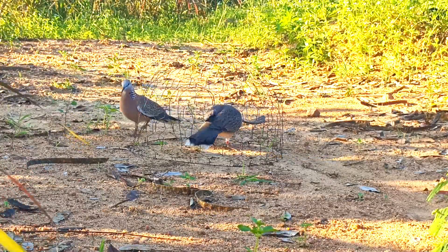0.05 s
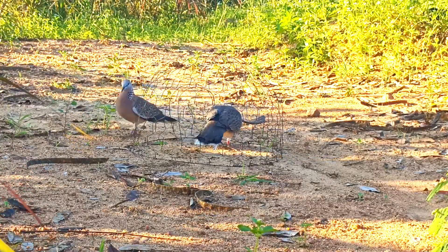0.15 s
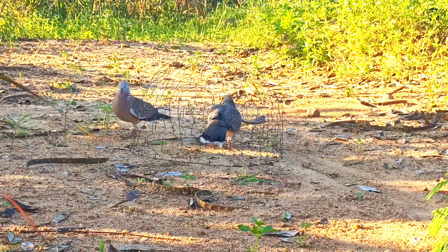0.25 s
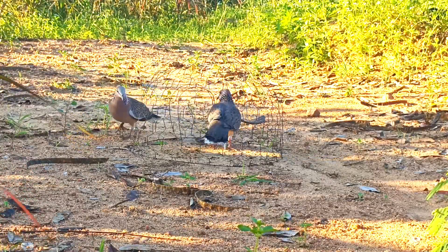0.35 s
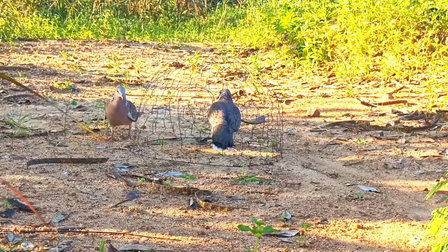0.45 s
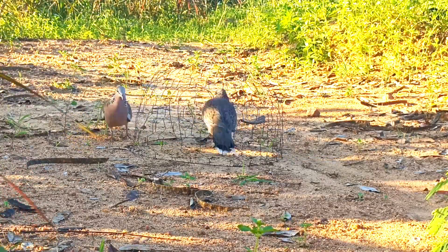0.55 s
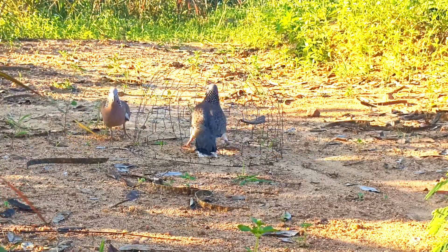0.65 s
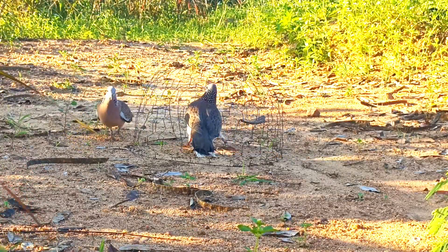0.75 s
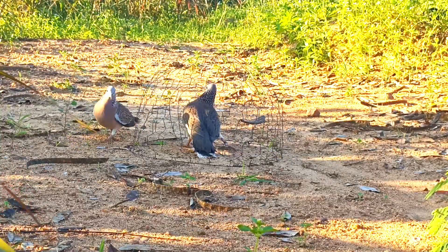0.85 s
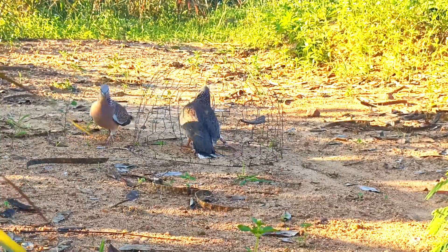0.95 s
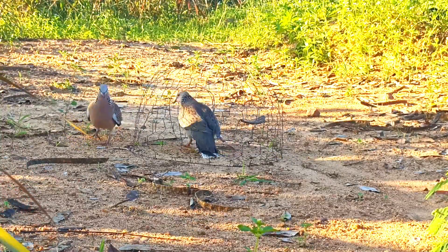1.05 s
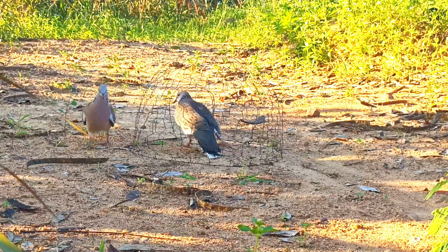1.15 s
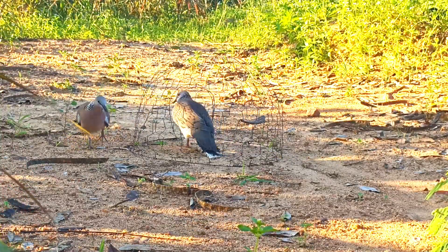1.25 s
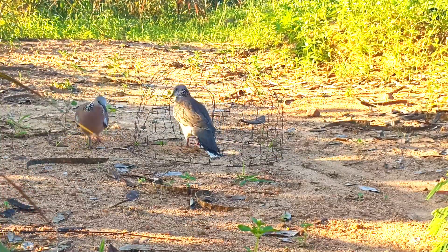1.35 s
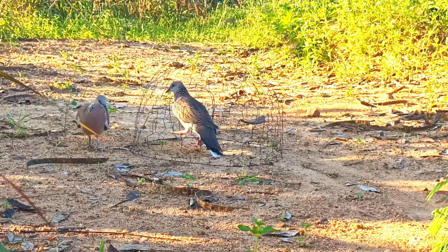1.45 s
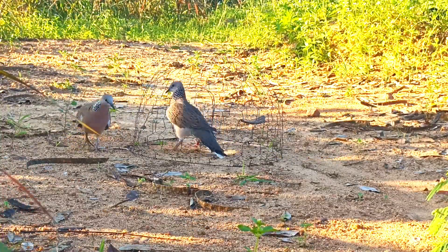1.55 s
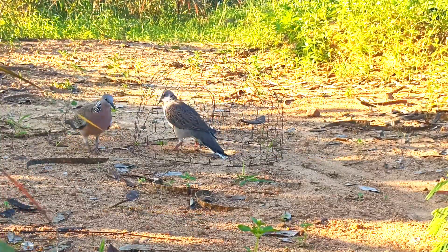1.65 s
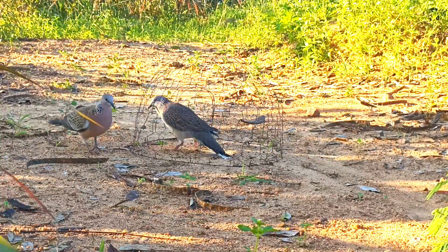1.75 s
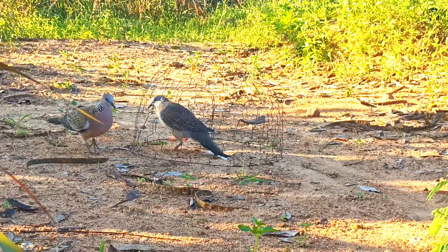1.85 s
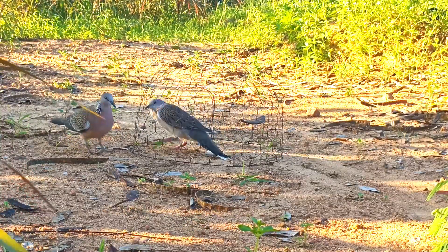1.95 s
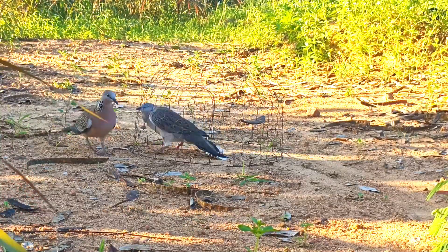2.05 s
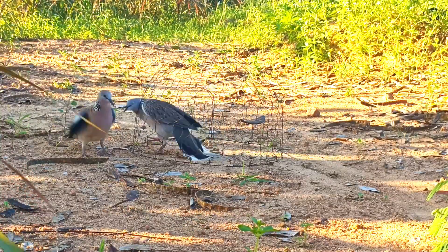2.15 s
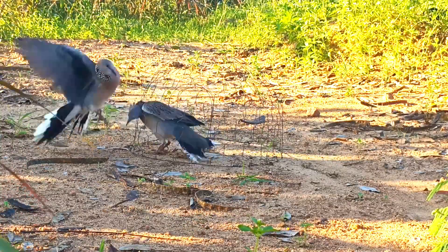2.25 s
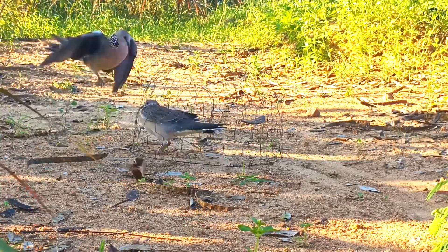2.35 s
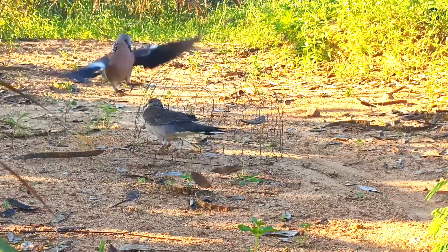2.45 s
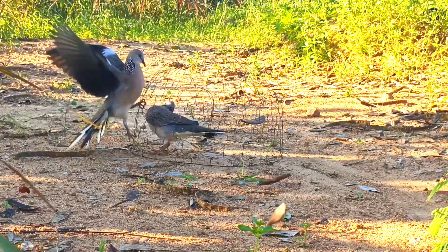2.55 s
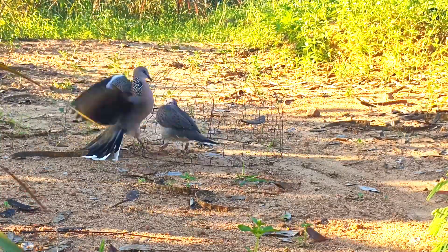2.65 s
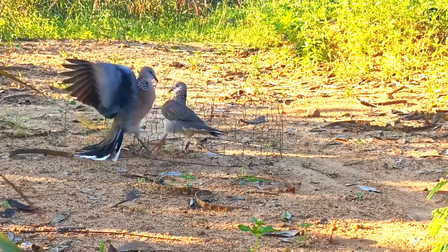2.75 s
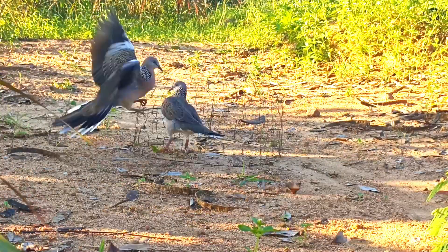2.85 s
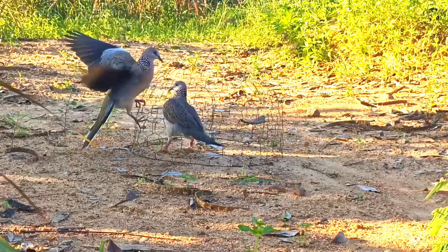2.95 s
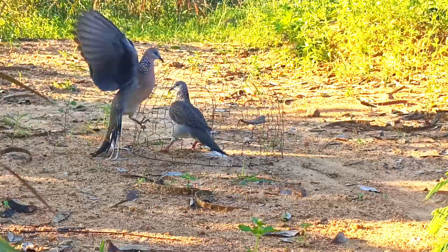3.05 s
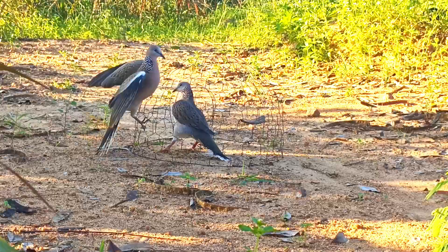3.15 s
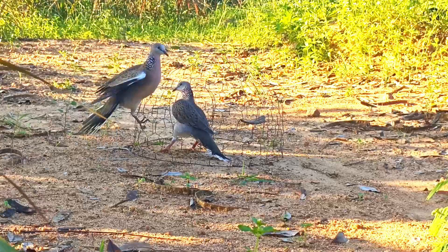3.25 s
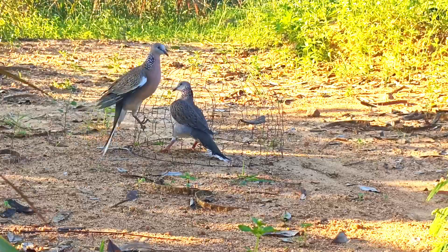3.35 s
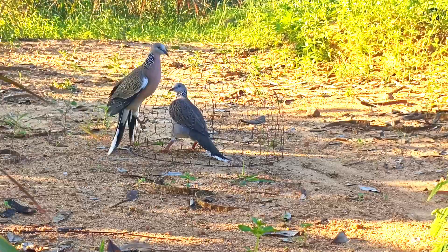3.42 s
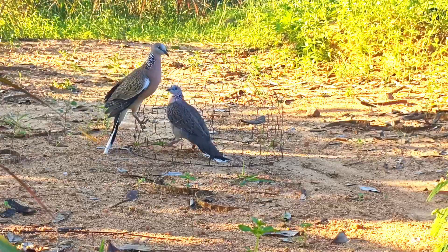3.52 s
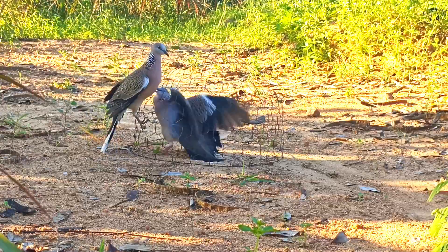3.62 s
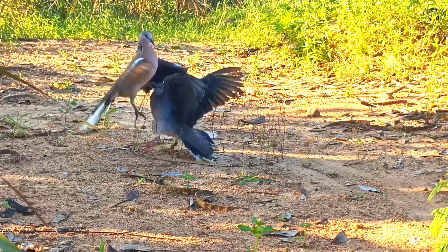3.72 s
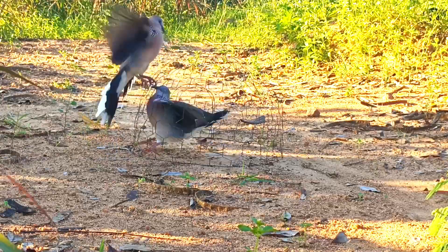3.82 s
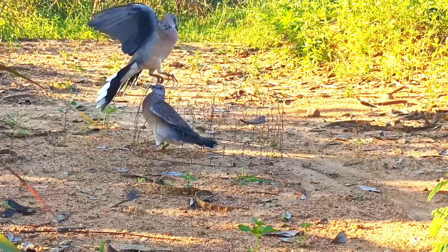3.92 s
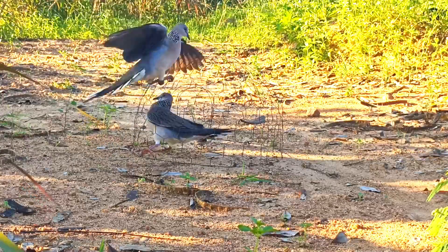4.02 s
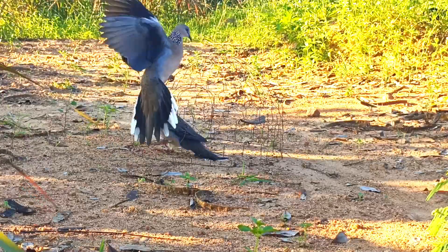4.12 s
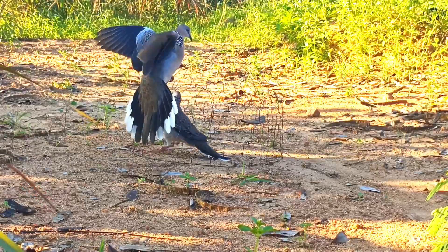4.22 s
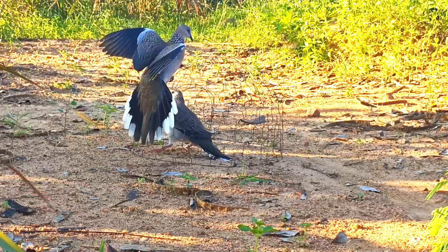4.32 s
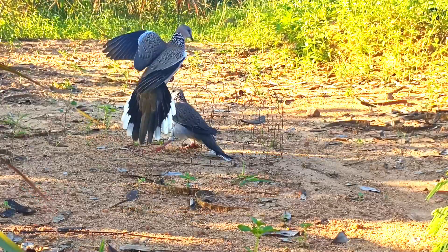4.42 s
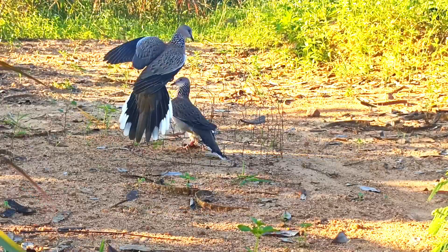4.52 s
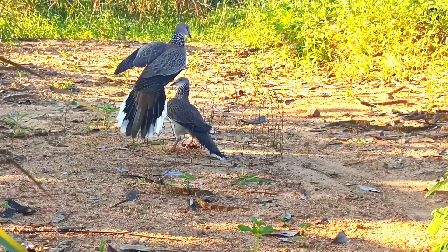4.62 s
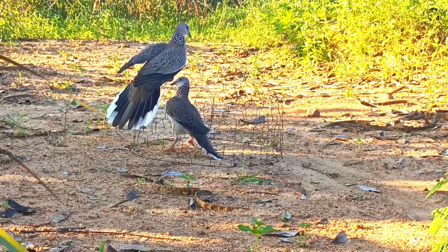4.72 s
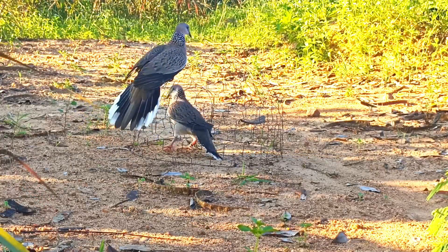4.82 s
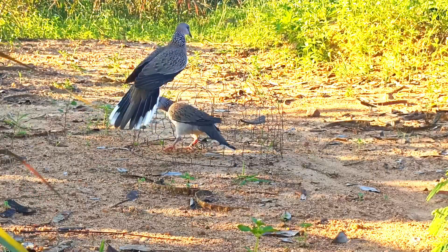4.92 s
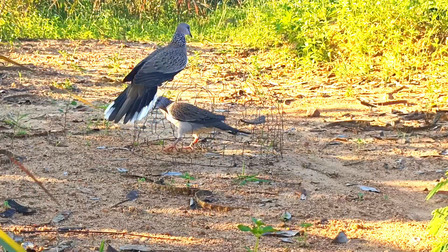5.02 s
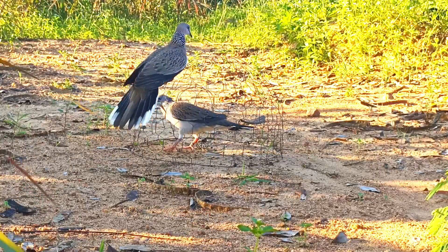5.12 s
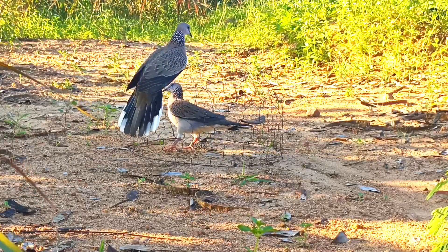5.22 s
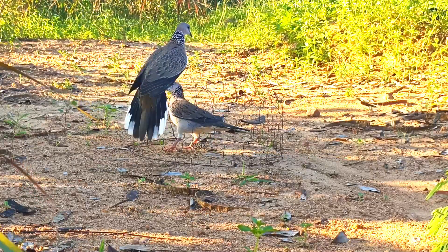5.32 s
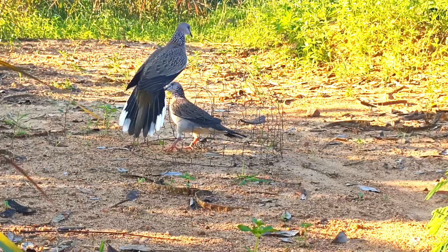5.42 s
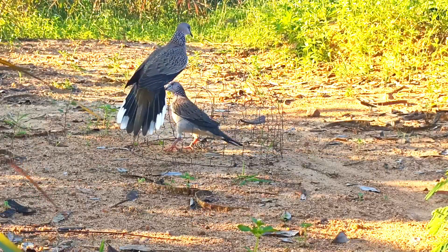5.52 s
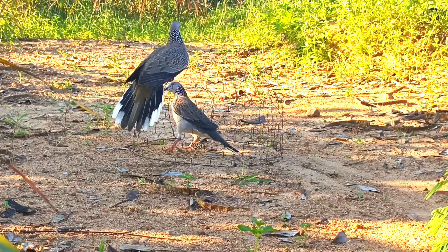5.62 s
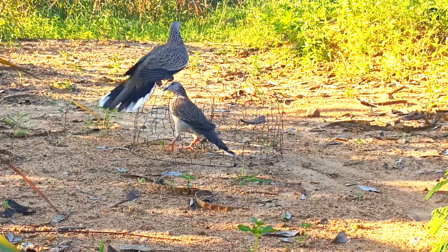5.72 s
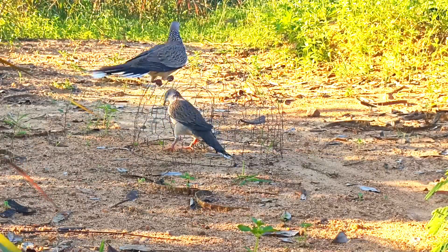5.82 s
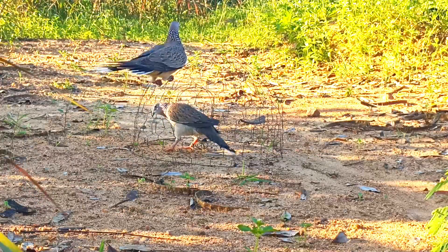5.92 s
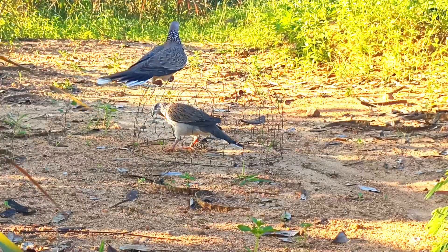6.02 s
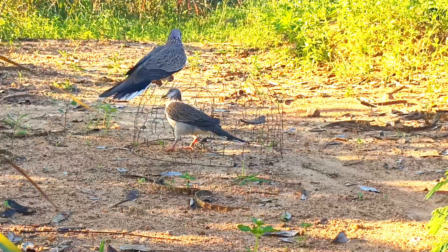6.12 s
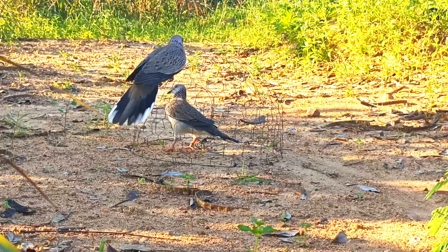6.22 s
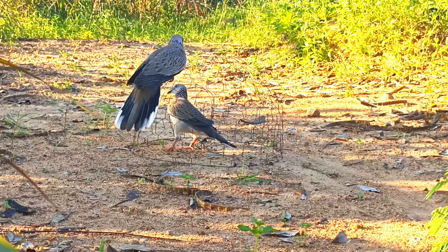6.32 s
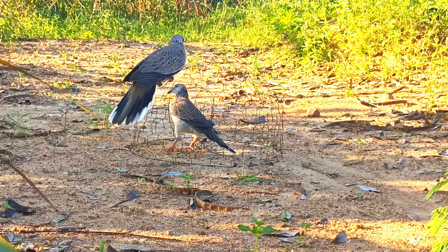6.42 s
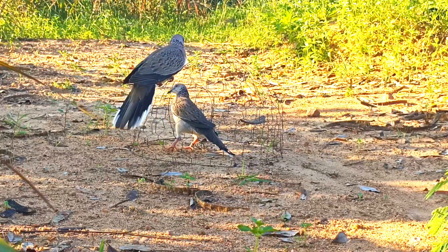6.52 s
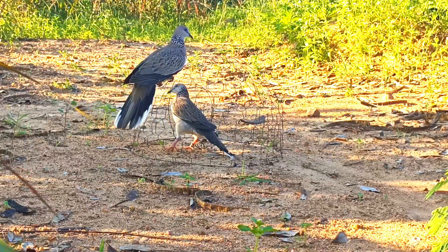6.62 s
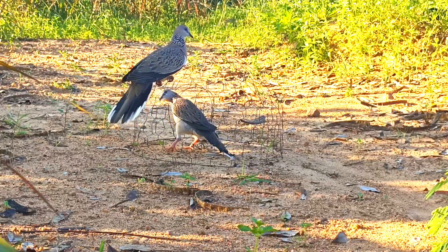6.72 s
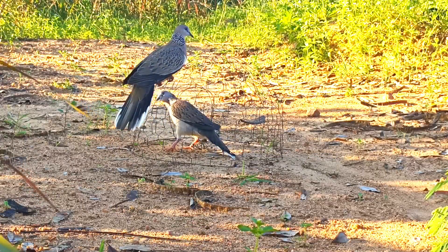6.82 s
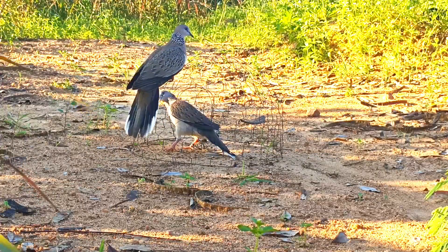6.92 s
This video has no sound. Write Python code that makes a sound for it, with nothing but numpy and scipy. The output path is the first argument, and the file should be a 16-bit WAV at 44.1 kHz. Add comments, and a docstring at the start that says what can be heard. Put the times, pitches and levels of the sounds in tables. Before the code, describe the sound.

A faint outdoor hiss and low rumble run throughout, with two high insects trilling softly in turn. Distant low coos come in the first second, and a few tiny snaps of feet on dry twigs follow until about 2 seconds. From about 2.3 to 3 seconds two doves strike at each other in a flurry of sharp, irregular wing claps, with soft thumps of air, swishes and feather rustle. The bushes add a short bright tail. A small bird chirps once near 2.9 seconds, followed by far coos. A second, shorter flurry comes at 3.8 to 4 seconds and ends with the hardest clap; the overall level dips and slowly creeps back. After a weak flap near 4.3 seconds there are only faint ticks of grit, soft wing swishes, thin distant whistles around 4.7 and 6 seconds, and a far coo near 6.4 seconds.

```python
"""A faint outdoor hiss and rumble, with far birds calling and two insects trilling in turn.
Then two doves scuffle on bare earth and strike with their wings in two flurries of claps, each a push
of air and a burst of feather contacts. Wings swish between and during the blows, the scrub scatters the
sound back, and a small bird chirps. The hardest blow turns the recorder's gain down; it creeps back up."""
import sys
import numpy as np
from scipy import signal
from scipy.fft import rfft, irfft, next_fast_len
from scipy.io import wavfile
from scipy.ndimage import uniform_filter1d, map_coordinates

SR = 44100
rng = np.random.default_rng(int(sys.argv[2]) if len(sys.argv) > 2 else 0)


def file_out(sig):
    """Save sig as 16-bit WAV at sys.argv[1]."""
    # one column per channel
    cols = np.atleast_2d(sig).T
    # limit, then scale
    lim = np.clip(cols, -1, 1)
    pcm = np.round(lim * 32767).astype(np.int16)
    wavfile.write(sys.argv[1], SR, pcm)


N = 307328
TOP_HZ = 15700  # band limit


def amp(db):
    return 10 ** (np.asarray(db) / 20)


def unit(x):
    return x / np.sqrt(np.mean(x ** 2) + 1e-20)


def wobble(per_s):
    """Smooth random curve, per_s knots a second."""
    knots = rng.standard_normal(int(N * per_s / SR) + 4)
    return map_coordinates(knots, [np.arange(N) * per_s / SR])


def filtered(x, response):
    """Apply a frequency response to x."""
    size = next_fast_len(len(x) + 8192)
    return irfft(rfft(x, size) * response(np.fft.rfftfreq(size, 1 / SR)), size)[:len(x)]


def equalised(x, curve):
    """Apply an (f/Hz, gain/dB) curve, interpolated over log frequency."""
    hz, db = np.transpose(curve)
    return filtered(x, lambda f: amp(np.interp(np.log(f + 1), np.log(hz + 1), db)))


def resonance(f, hz, q):
    """Causal response of one damped mode."""
    return 1j * f * hz / q / (hz * hz - f * f + 1j * f * hz / q)


def noise(spectrum):
    """Coloured noise, rms 1."""
    return unit(equalised(rng.standard_normal(N), spectrum))


def swell(mid_s, half_s):
    """Bell-shaped rise and fall."""
    return np.exp(-0.5 * np.minimum(((np.arange(N) / SR - mid_s) / half_s) ** 2, 100))


def add(track, at_s, x):
    """Mix x into the track."""
    start = round(at_s * SR)
    track[start:start + len(x)] += x[:N - start]


def burst(x, length_s):
    """Scale x to the energy of rms 1 held for length_s."""
    return x * np.sqrt(length_s * SR / (np.sum(x ** 2) + 1e-20))


def ring(t, hz, cycles):
    """Damped swing of a struck part, rms 1."""
    return unit(np.sin(2 * np.pi * hz * t) * t * np.exp(-t * hz / cycles))


# Outdoor noise spectra: f/Hz, relative density/dB
RUMBLE_SPECTRUM = [(15, -63), (25, -19), (43, -23), (58, -7.5), (92, 1.5), (320, -5), (372, -6.5),
                   (465, -10.5), (533, -8.5), (900, -25.5), (1170, -37), (1980, -120)]
HISS_SPECTRUM = [(400, -15), (700, 5), (1200, 1.5), (2000, 0), (3200, -2.5), (3800, -8), (6000, -11),
                 (8700, -14), (9900, -6.5), (10700, -12.5), (11500, -5.5), (15500, -14.5)]


def air(rumble_db=-45, waver_db=0.48, hiss_db=-50.5):
    """Far low rumble under a soft even hiss."""
    rumble = amp(rumble_db + waver_db * wobble(6.77)) * noise(RUMBLE_SPECTRUM)
    return rumble + amp(hiss_db) * noise(HISS_SPECTRUM)


def trill(hz, depth, haze, stroke_hz=184):
    """Insect tone, pulsed by wing strokes and smeared by grass, in a haze of farther ones."""
    tone = filtered(rng.standard_normal(N), lambda f: np.exp(-((f - hz) / 150) ** 2))
    chorus = filtered(rng.standard_normal(N), lambda f: np.exp(-((f - hz) / 360) ** 4))
    strokes = np.cumsum(stroke_hz * (1 + 0.009 * wobble(3.4))) / SR
    pulsed = tone * (1 + depth * np.cos(2 * np.pi * strokes))
    return unit(unit(pulsed) + haze * unit(chorus))


def phrases(peaks, rise_db_per_s=18.5, fall_db_per_s=170):
    """Insect envelope: each phrase grows slowly and breaks off."""
    t = np.arange(N) / SR
    levels_db = [db - np.maximum(rise_db_per_s * (s - t), fall_db_per_s * (t - s)) for s, db in peaks]
    return amp(np.max(levels_db, axis=0))


# Phrase peaks of the lower and the higher insect: t/s, level/dB
LOW_INSECT_PEAKS = [(.73, -56), (1.87, -55.5), (2.86, -54.5), (4.03, -56), (5.04, -55.5), (6.12, -53.5),
                    (6.97, -57.5)]
HIGH_INSECT_PEAKS = [(.38, -61), (1.39, -59), (2.37, -59), (3.39, -58), (4.3, -58), (5.39, -57),
                     (6.54, -56.5)]


def insects(chorus_db=-70):
    """Two trills swell in turn over a faint steady chorus."""
    low = phrases(LOW_INSECT_PEAKS) * trill(hz=7007, depth=0.71, haze=0.5)
    high = phrases(HIGH_INSECT_PEAKS) * trill(hz=7270, depth=0.9, haze=0.99)
    return low + high + amp(chorus_db) * trill(hz=7450, depth=0.5, haze=2.2)


# Low coos and thin whistles: mid t/s, half length/s, f/Hz, glide/(Hz/s), level/dB
FAR_BIRD_CALLS = [(0.252, 0.051, 552, -4.5, -53), (0.664, 0.024, 526, 1.5, -45),
                  (3.034, 0.068, 501, 7, -44.5), (3.339, 0.042, 512, 100, -46.5),
                  (4.69, .036, 3190, 1.5, -53.5), (6.024, 0.044, 3180, -400, -58),
                  (6.35, 0.07, 530, 401, -46)]


def far_birds(blur_hz=28, blur_ref_hz=530, flicker_db=2):
    """Far calls arrive blurred by the trees."""
    out, t = np.zeros(N), np.arange(N) / SR
    drift_hz = blur_hz * wobble(160)
    flicker = amp(flicker_db * wobble(60))
    for mid_s, half_s, pitch_hz, glide, db in FAR_BIRD_CALLS:
        hz = pitch_hz + glide * (t - mid_s) + drift_hz * (pitch_hz / blur_ref_hz) ** 0.414
        tone = np.sin(2 * np.pi * np.cumsum(hz) / SR)
        out += amp(db) * swell(mid_s, half_s) * unit(flicker * tone)
    return out


def chirp(at_s=2.868, length_s=0.0877, pitch_hz=3290, db=-40, scoop_hz=410, scoop_s=0.0054):
    """A small bird nearby: one note scoops up, holds its pitch and stops."""
    age_s = np.maximum(np.arange(N) / SR - at_s, 0)
    hz = (pitch_hz - scoop_hz * np.exp(-age_s / scoop_s)) * (1 + 0.01 * wobble(90))
    envelope = np.clip(np.minimum(age_s, length_s - age_s) / 0.0026, 0, 1)  # 2.6 ms fades
    return amp(db) * envelope * unit(np.sin(2 * np.pi * np.cumsum(hz) / SR))


# Scatter from ground and bushes: f/Hz, gain/dB
SCRUB_RESPONSE = [(100, 3), (250, -14), (600, -17), (1200, -9.5), (3000, 2.5), (6000, 9.5), (12000, 5),
                  (16000, 1)]


def scrub(x, rise_s=0.0049, t60_s=0.24, faint_db=-22, faint_t60_s=0.21):
    """Ground and bushes scatter a short, bright, diffuse tail off loud sounds."""
    out, t = np.zeros(N), np.arange(SR // 2) / SR
    decay = amp(-60 * t / t60_s) + amp(faint_db - 60 * t / faint_t60_s)
    envelope = (1 - np.exp(-t / rise_s)) * decay
    hop = SR // 200
    for start in range(0, N - 2 * hop, hop):
        piece = x[start:start + 2 * hop] * np.hanning(2 * hop)
        if np.abs(piece).max() > 0.02:
            tail = envelope * rng.standard_normal(len(t))  # fresh each time: no fixed colouring
            add(out, start / SR, signal.fftconvolve(piece, tail / np.linalg.norm(tail)))
    return equalised(out, SCRUB_RESPONSE)


def grit(mid_s=3.5, half_s=1, db=-61, hz=12000, per_s=45, spread_db=4):
    """Sand grains tick at random under the scuffling feet."""
    ticks = (rng.random(N) < per_s / SR) * amp(spread_db * rng.standard_normal(N))
    grains = filtered(ticks, lambda f: resonance(f, hz, q=2.3))
    return amp(db) * swell(mid_s, half_s) * unit(grains)


# Feet on dry twigs and grit: t/s, level/dB, ring f/Hz
FOOTFALLS = [(.865, -39.5, 1780), (1.785, -46, 12000), (1.841, -43.5, 1670), (1.865, -46, 1730),
             (1.947, -44.5, 1800), (2.523, -28.5, 10900), (2.554, -35, 6100), (3.303, -44, 1650),
             (3.422, -48, 12500), (4.236, -35, 8930), (4.427, -42, 12000), (4.854, -40, 12330),
             (4.88, -40, 12000), (6.675, -46, 1850)]


def steps(cycles=7, twig_hz=1750, twig_q=3.9):
    """Dry litter snaps underfoot: twigs ring briefly, smaller and higher bits only tick."""
    out, t = np.zeros(N), np.arange(SR // 20) / SR
    for at_s, db, hz in FOOTFALLS:
        decay_s = cycles / hz
        q = twig_q * (twig_hz / hz) ** 0.6
        snap = rng.standard_normal(len(t)) * np.exp(-t / decay_s)
        ringing = filtered(snap, lambda f: resonance(f, hz, q) ** 2)
        add(out, at_s, amp(db) * burst(ringing, decay_s))
    return out


# Wing sweeps between and during the blows: mid t/s, half length/s, whoosh level/dB, rustle level/dB
WING_SWEEPS = [(2.344, 0.026, -34.5, -53.5), (2.411, 0.03, -32.5, -42), (2.498, 0.036, -40, -44),
               (2.641, 0.014, -33, -52), (2.812, 0.067, -42.5, -49), (3.32, .049, -49, -73),
               (3.839, 0.015, -36, -37.5), (3.906, 0.015, -31, -30), (3.959, 0.0103, -28, -37),
               (3.995, 0.0052, -13.5, -31), (4.88, .03, -62, -54), (5.414, 0.092, -79, -55),
               (5.828, .068, -45, -81)]


def swishes(lead_s=0.0063, lead_half_s=0.0125, lead_db=-24.5, grain_db=4):
    """Air rushes round the wing ahead of, during and between blows; feathers rub in fine grains."""
    lead_power = sum((amp(db + lead_db) * swell(s - lead_s, lead_half_s)) ** 2
                     for s, _, db, *_ in WING_BLOWS)
    whoosh = sum(amp(db) * swell(s, half_s) for s, half_s, db, _ in WING_SWEEPS)
    rustle = sum(amp(db) * swell(s, half_s) for s, half_s, _, db in WING_SWEEPS)
    rush = noise([(40, -19), (150, -5.5), (600, -14), (1800, -24.5), (4000, -46), (9000, -42.5)])
    rubbing = noise([(800, -7), (2500, 7), (5000, 0), (8500, -6), (12000, 10.5), (16000, -4.5)])
    grains = unit(rubbing * amp(grain_db * wobble(610)))
    return np.sqrt(lead_power + whoosh ** 2) * rush + rustle * grains


def feather_contacts(t, length_s, per_s=1700, scrape=0.147, attack_s=0.00032, linger=0.54):
    """Feathers land at random moments; together they favour no one pitch."""
    release = np.exp(-np.maximum(t - length_s, 0) / (linger * length_s))
    pressure = np.minimum(t / attack_s, 1) * release
    ticks = (rng.random(len(t)) < per_s / SR) * rng.standard_normal(len(t))
    spectrum = rfft(pressure * (ticks + scrape * rng.standard_normal(len(t))))
    power = np.abs(uniform_filter1d(np.abs(spectrum) ** 2, size=5)) + 1e-9
    whitened = irfft(spectrum / np.sqrt(power), len(t))
    return whitened * pressure ** 0.053


def driven(contacts, hz, q):
    """Resonant part shaken by the contacts, rms 1."""
    return unit(filtered(contacts, lambda f: resonance(f, hz, q) ** 2))


# Wing blows: t/s, length/s, level/dB, slap f/Hz, thump/dB re level, crack f/Hz, crack/dB re level
WING_BLOWS = [(1.937, 0.023, -46.5, 1030, 7.5, 2250, -12), (2.351, .0038, -23, 820, 6, 2130, -23),
              (2.367, 0.0031, -11.5, 980, -4.5, 1950, 0), (2.375, 0.0022, -15.5, 880, -18, 1970, -11),
              (2.429, .0029, -20.5, 660, 15, 2510, -15), (2.4603, 0.012, -19.5, 890, -1.5, 2170, -11),
              (2.6, .004, -37.5, 900, 4, 2800, -13), (2.623, 0.0065, -19, 870, -6.5, 3206, -15.5),
              (2.626, 0.0042, -19, 860, 1.5, 3090, -3), (2.71, 0.004, -33.5, 830, -9, 2860, -14),
              (2.767, 0.015, -38, 1177, -10, 2090, -16), (2.8, 0.0046, -33, 803, -1, 2850, -26),
              (2.8652, 0.0064, -25, 1043, -11, 2800, -14.5), (2.9373, 0.0088, -29.5, 790, 4, 3150, -12),
              (2.9591, 0.0048, -15.5, 866, -4, 2470, -15), (2.974, 0.0035, -13.5, 952, -4, 2650, -10.5),
              (3.222, 0.0153, -38.5, 800, 2, 2560, -7.5), (3.825, .0095, -36.5, 1087, -6.5, 2970, -12),
              (3.858, 0.0089, -31.5, 810, 3.5, 2537, -16), (3.8794, 0.0026, -13.5, 952, .5, 2544, -8),
              (3.886, 0.004, -5.5, 1110, 0.5, 2100, -24), (3.9918, .0024, -8, 1130, -4, 3343, -0.5),
              (3.9943, 0.0026, -3, 1070, -16.5, 3040, -12), (4.184, 0.0099, -46.5, 1010, 2, 2870, -11),
              (4.252, 0.0048, -30, 1330, -1, 2130, -10)]
# Body of the spread wing, colouring the slaps: f/Hz, gain/dB
WING_RESPONSE = [(100, -1), (420, 2), (640, 9), (800, -3), (1150, -2), (1600, 1), (2500, -1.5), (5000, 6)]


def claps(thump_ref_hz=303, thump_ref_s=0.005, stiff_hz=2000, fizz_hz=12000, ring_share=0.6):
    """A wing squeezes out a pulse of air while its feathers land one after another on ringing quills."""
    thumps, slaps, cracks = np.zeros((3, N))
    t = np.arange(SR // 16) / SR
    for at_s, length_s, db, slap_hz, thump_db, crack_hz, crack_db in WING_BLOWS:
        feathers = feather_contacts(t, length_s)
        # the air pulse swings about once; a longer contact lowers and stretches it
        thump_hz = thump_ref_hz * (thump_ref_s / length_s) ** 0.26
        push = ring(t, thump_hz, cycles=0.35 + 0.018 * length_s * thump_hz)
        flutter = 0.73 * driven(feathers, 0.68 * thump_hz, q=0.54)
        add(thumps, at_s, amp(db + thump_db) * burst(push + flutter, length_s))
        vane = driven(feathers, slap_hz, q=1.39) + ring_share * ring(t, slap_hz, cycles=0.77)
        add(slaps, at_s, amp(db) * burst(vane, length_s))
        # thick quills ring; thin ones crack higher and die sooner
        stiffness = min(stiff_hz / crack_hz, 1) ** 2
        quills = driven(feathers, crack_hz, q=4.9 * stiffness)
        quills += ring_share * ring(t, crack_hz, cycles=2.6 * stiffness)
        add(cracks, at_s, amp(db + crack_db) * burst(quills, length_s))
        # more fizz with a harder crack and thinner quills
        fizz_db = -7 + 0.29 * crack_db + 7.5 * np.log2(crack_hz / stiff_hz)
        barbs = filtered(feathers, lambda f: resonance(f, fizz_hz, q=4.1) * (f < TOP_HZ))
        add(cracks, at_s, amp(db + fizz_db) * burst(barbs, length_s))
    # a wing is too small to radiate deep bass
    low_cut = signal.butter(2, 70, "highpass", fs=SR, output="sos")
    return signal.sosfilt(low_cut, thumps) + equalised(slaps, WING_RESPONSE) + cracks


def scene():
    """The doves and their scatter, over birds, insects and air; mono."""
    doves = claps() + swishes() + steps() + grit()
    return (doves + amp(-14) * scrub(doves) + chirp() + far_birds() + insects() + air())[None]


def gain_control(x, limit_db=-10.5, window_s=0.0094, recover_db_per_s=1.03):
    """Gain drops at once when the level passes the limit, then recovers slowly."""
    power = np.abs(uniform_filter1d(x ** 2, size=round(window_s * SR)))
    excess_db = np.maximum(10 * np.log10(power + 1e-20) - limit_db, 0)
    recovery_db = recover_db_per_s * np.arange(N) / SR
    return x * amp(recovery_db - np.maximum.accumulate(excess_db + recovery_db))


def record(dry):
    """Gain control, soft clipping at full scale, then a steep band limit."""
    ducked = gain_control(dry[0])
    rounded = ducked / (1 + np.abs(ducked) ** 6) ** (1 / 6)
    return filtered(rounded, lambda f: 1 / (1 + (f / TOP_HZ) ** 120))[None]


dry = scene()
out = record(dry)
file_out(out)
```